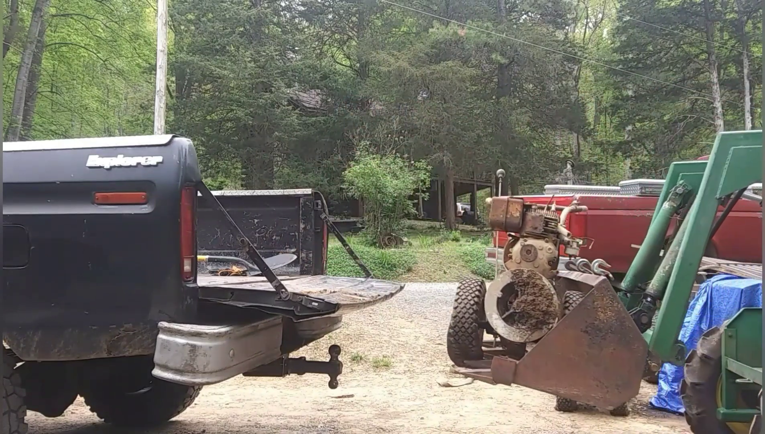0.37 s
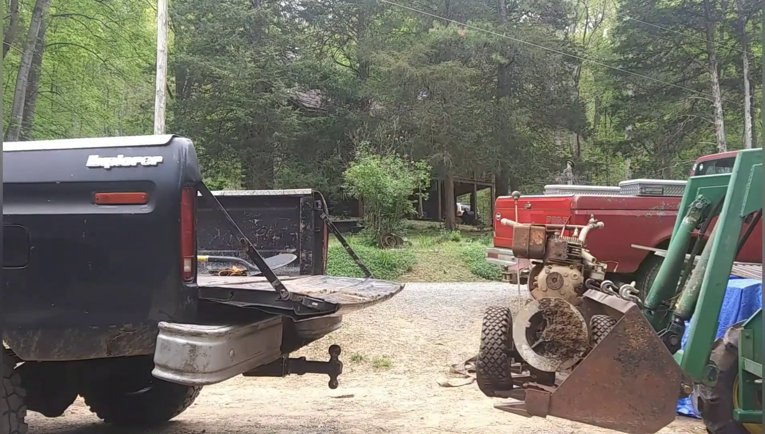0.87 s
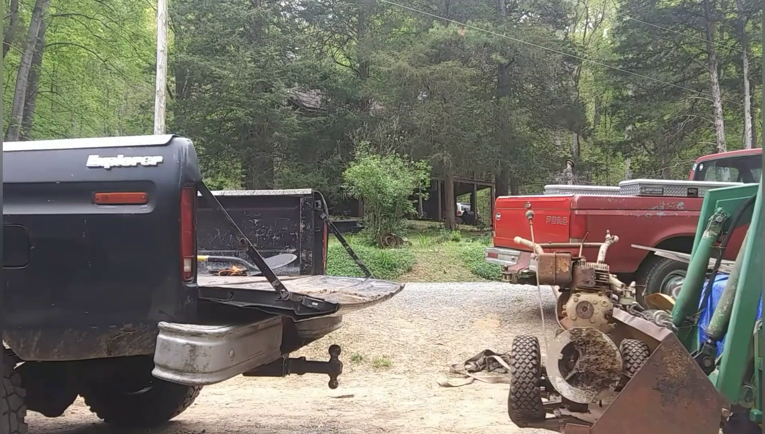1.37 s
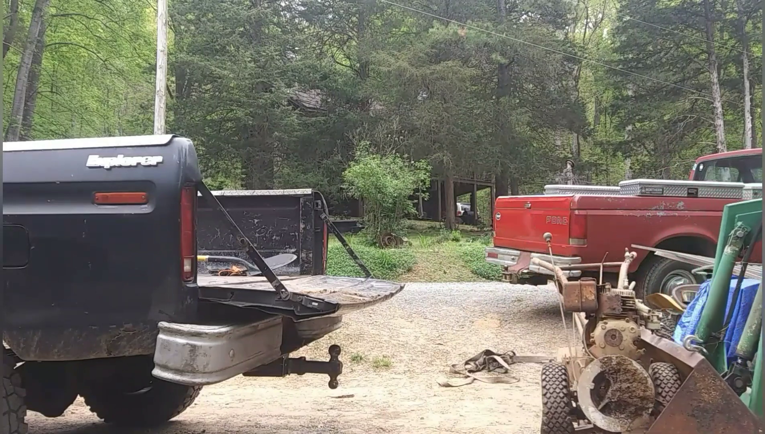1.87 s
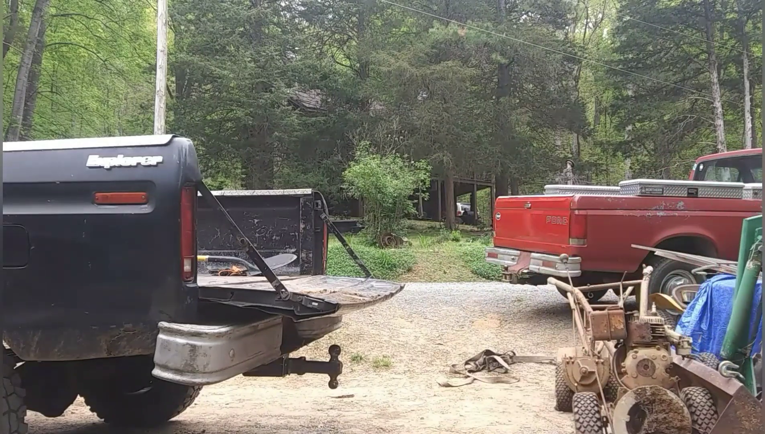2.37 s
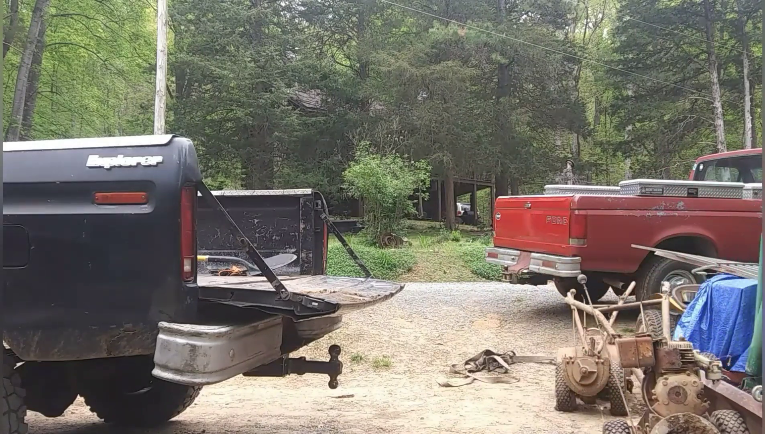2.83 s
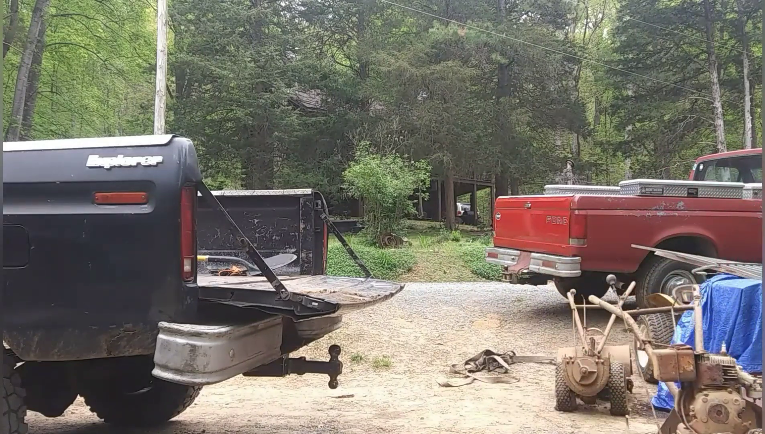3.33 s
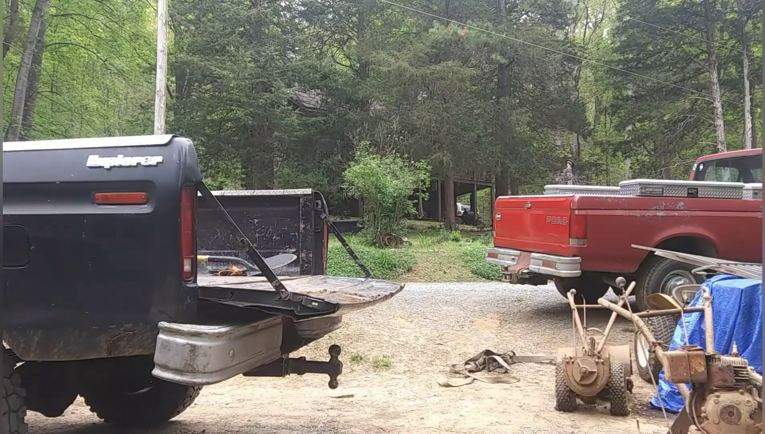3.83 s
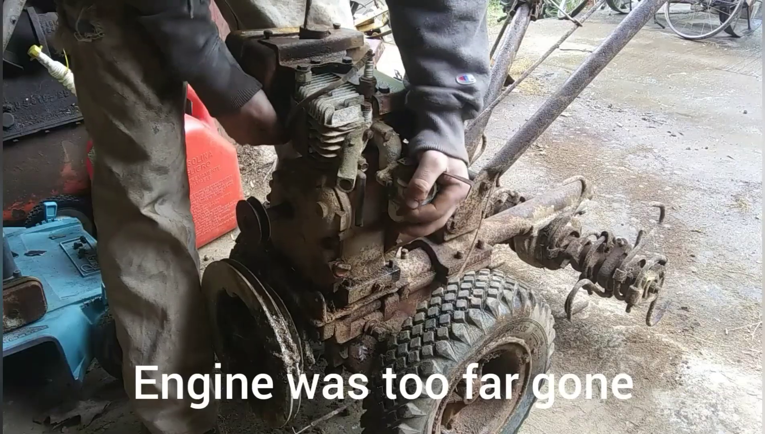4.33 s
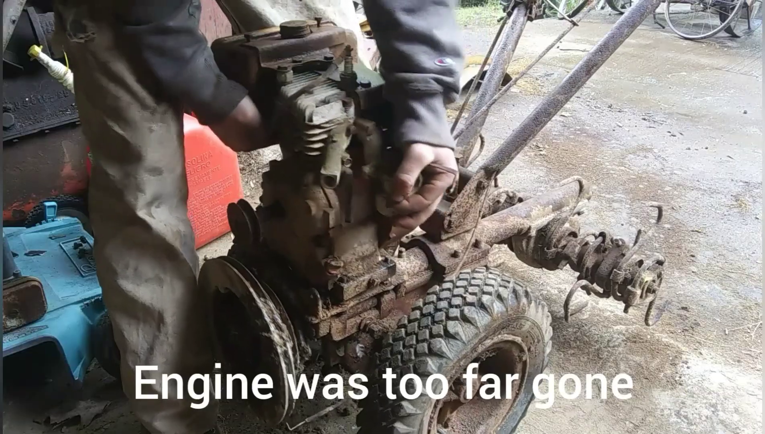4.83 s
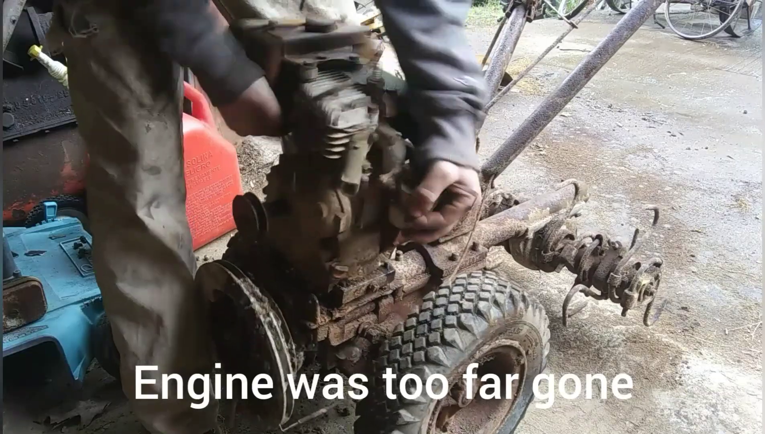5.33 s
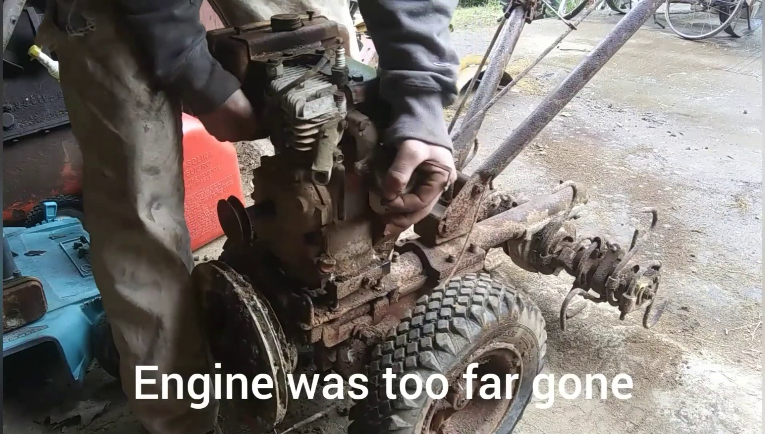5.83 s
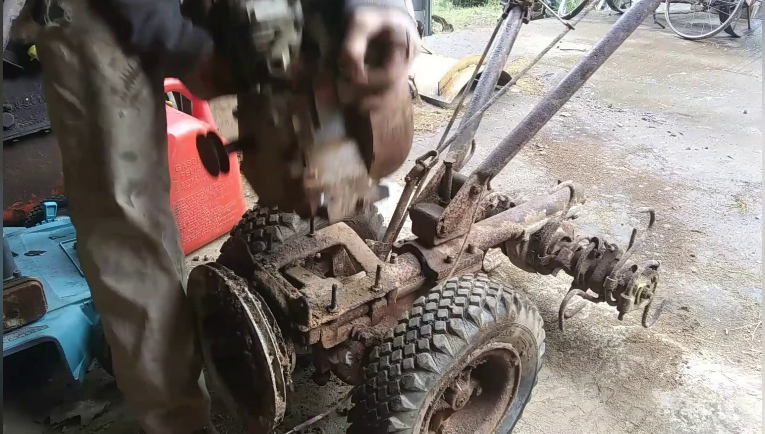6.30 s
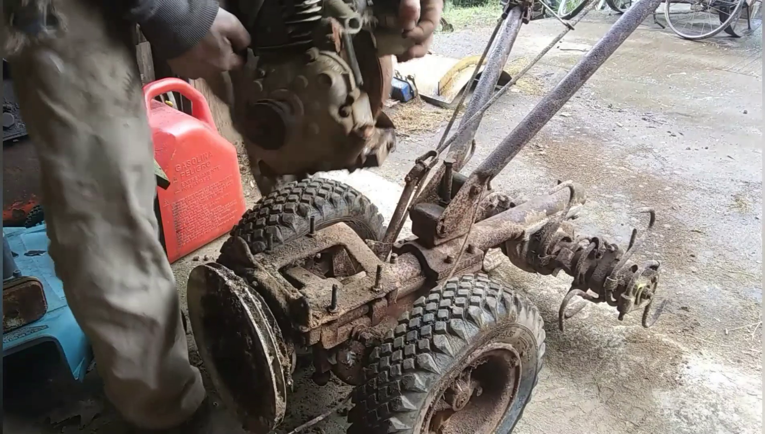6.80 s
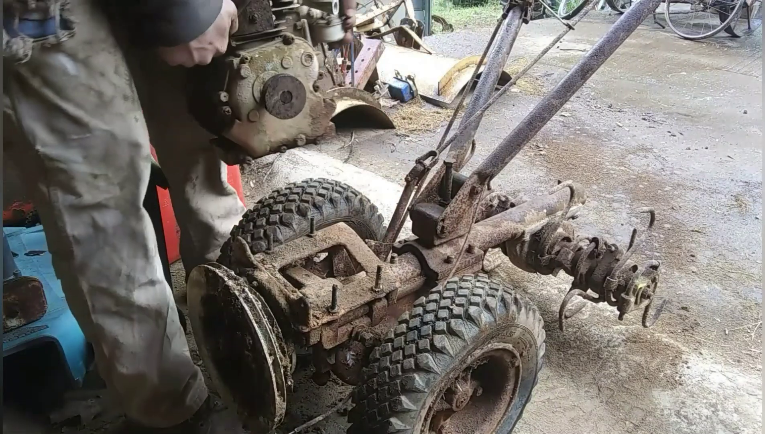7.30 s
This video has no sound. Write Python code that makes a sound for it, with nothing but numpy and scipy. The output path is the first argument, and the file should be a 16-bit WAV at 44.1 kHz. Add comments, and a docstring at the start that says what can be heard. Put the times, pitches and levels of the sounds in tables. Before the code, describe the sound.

From 0 to 3.9 seconds a small diesel tractor runs loudly in an open yard: rapid knocking about twenty-one cycles a second, a buzzing low-mid exhaust throb, rough clatter and hissy tinwork. Speed stays governed, with a tiny sag around 1.5; the tone shifts and dulls slightly as it backs away. At 3.95 it stops dead on a cut to a quieter concrete shed. Grit scuffs, then a squeak and clank at 4.4, more squeaks around 4.7 and tinny clinks to 4.9. Iron clanks cluster from 5.0 to 5.4, with chirping squeaks around 5.5, clinks near 5.7 and harsher squeaks at 5.85 to 6.0. The strongest heavy clanks and a scrape fall at 6.0 to 6.3. Afterwards come sparse boot shuffles, fading grit and faint creaks, near silence around 7.3, and a soft knock with creaks at 7.55. Close microphone, short reverberation, slight hiss.

```python
"""Tractor in a yard, then a seized engine

A small diesel tractor runs in a yard: exhaust throb from multiples of the engine cycle, knocks and
noise shaped by the block. The scene then cuts to an open shed, where a seized engine is rocked loose
from a rusty frame: the joint squeaks as stick-slip tones, iron clanks and sheet metal clinks as struck
modes, grit scrapes and boots shuffle on concrete as swells of grainy noise, and narrow noise creaks."""
import sys
import numpy as np
from scipy import signal
from scipy.fft import rfft, irfft, next_fast_len
from scipy.io import wavfile

SR = 44100
rng = np.random.default_rng(int(sys.argv[2]) if len(sys.argv) > 2 else 0)


def volts_from_decibels(level):
    """Turn decibel levels (scalar or array-like) into linear amplitude factors."""
    exponent = np.asarray(level, float) / 20
    return 10 ** exponent


def int16_out(signal):
    """Quantize to a 16-bit WAV file."""
    q = np.round(np.clip(np.atleast_2d(signal).T, -1, 1) * 32767)
    wavfile.write(sys.argv[1], SR, q.astype(np.int16))


N = 338688   # samples, 7.68 s

# the running engine as it backs away and turns: t/s, level/dB, then gains against that level:
# treble/dB, 2 kHz block ring/dB, 9.65 kHz hiss/dB, hum of multiples 12 to 16/dB
RUNNING = [(0, -15.5, -2.5, 0.5, 4.5, -2), (.3, -15.5, -5.5, 0, 3.5, -4.5), (.6, -16, -5, 1, 1, 3),
           (1.3, -16.5, -4, 0.5, 3.5, -0.5), (1.6, -16.5, -5, 0, 4, 0), (1.8, -17.5, -4, 6, 2.5, 0.5),
           (2.3, -16, -6.5, 1.5, 1.5, 2.5), (3, -18, -4.5, 5, 0.5, 4), (3.3, -15, -5, -1.5, 2, 3.5),
           (3.6, -16, -6.5, 2.5, 1.5, -1), (3.92, -17, -7, 2, 0.5, 2)]
CUT_S = 3.945   # the yard ends, the shed begins
# governed speed, sagging once under load: t/s, engine cycles per second/Hz
ENGINE_SPEED = [(0, 21.295), (1.3, 21.295), (1.48, 21.0), (1.66, 21.31), (3.25, 21.31), (3.4, 21.41),
                (3.95, 21.41)]
START_CYCLE = -0.48
# exhaust throb on the cycle's multiples: multiple, relative level/dB
EXHAUST = [(4, -31), (5, -25), (6, -9), (7, -21), (8, -12), (9, -17), (10, -10), (11, -11), (12, -7),
           (13, -8), (14, 0), (15, -3.5), (16, -4), (17, -2), (18, -3), (19, -1), (20, -5), (21, -6),
           (22, -13), (23, -12), (24, -7), (25, -9), (26, -14)]
# higher multiples that stand out of the clatter: multiple, relative level/dB
GEAR_LINES = [(32, -8.5), (39, -1), (46, -4), (48, -17), (53, -2), (58, -8), (62, -3)]
# the 24th multiple grows near the end: t/s, gain/dB
LATE_LINE = [(0, -1.5), (3.35, 3), (3.55, 8)]
EXHAUST_DB = -19   # all these lines against the engine noise
THUMP_SLANT_RAD, THUMP_SPREAD_DB = .03, 2   # each thump falls in pitch; the strength drifts
# knocks within one cycle: share of the cycle, relative level/dB, t60/s (shorter in the treble)
KNOCKS = [(0.92, 9, 0.037), (0.46, 6.5, 0.033), (0.079, -6.5, 0.074), (0.299, 4, 0.014)]
KNOCK_RISE_S = .0042
# how much of the clatter throbs with the knocks: f/Hz, knock against steady noise/dB
KNOCK_SHARE = [(400, -4), (1000, -3), (2200, 1), (3000, 1.5), (5000, -.5), (9000, -5), (15000, -7)]
# spectrum of engine block and tinwork: f/Hz, relative density/dB
CLATTER = [(35, -63), (60, -41), (113, -3.5), (168, -1.5), (287, 1.5), (388, 0.5), (591, -9), (1010, -6.5),
           (1470, -10), (1650, -16.5), (1990, -16.5), (3490, -19.5), (4300, -12), (9740, -14.5),
           (15900, -19.5)]
# resonances of the block: f/Hz, width/Hz, boost/dB
BLOCK = [(824, 290, 2), (1045, 160, 5.5), (1477, 210, 5), (1990, 576, 9), (2910, 135, 7.5),
         (4260, 600, 3.5), (5670, 980, 3.5), (8500, 230, 8), (8540, 200, -6)]
TICK_DB, TICK_T60_S = -12.5, .012   # ticks of the block's upper resonances, against the noise

# steady rubbing of the load on the frame: t/s, level/dB
RUBBING = [(3.95, -44), (4.1, -45.5), (4.46, -57), (4.62, -43), (5.0, -42), (5.29, -39), (5.38, -33.5),
           (5.48, -37.5), (5.67, -46), (5.9, -46), (6.05, -31.5), (6.17, -33), (6.3, -41.5), (6.5, -57.5),
           (6.84, -48), (7.15, -67), (7.4, -50.5), (7.68, -46.5)]
# spectrum of the grit: f/Hz, relative density/dB
GRIT = [(35, -83), (60, -46), (96, -12), (176, -4.5), (362, -9), (839, -5), (900, -5.5), (1370, -5.5),
        (2760, -11), (7890, -23), (15900, -41.5)]
RUB_TREBLE_DB = -11.5   # part above 3 kHz against the dull part
# scuffs of grit and boots: t/s, peak level/dB, t60/s, treble against the peak/dB
SCUFFS = [(4.028, -38.5, 0.43, -5.5), (4.07, -36.5, 0.42, -17), (4.375, -47, 0.33, -28),
          (4.401, -37.5, 0.86, -27), (4.455, -40.5, 0.79, -3), (4.569, -51.5, 0.61, 8.5),
          (4.609, -37, 0.7, -12), (4.81, -35, 0.07, -8), (5.125, -38.5, 0.69, 0), (5.587, -34, 0.26, -5),
          (5.948, -39.5, 0.26, 7.5), (6.2, -20.5, 0.17, -10.5), (6.49, -44.5, 0.53, -8),
          (6.594, -47, 0.41, -10), (6.697, -48.5, 1.1, -5.5), (6.731, -39, 0.81, -10),
          (6.789, -41, 0.2, -0.5), (6.938, -46.5, 0.82, -8.5), (7.152, -57, 0.54, 3.5),
          (7.195, -57, 0.22, 5), (7.292, -54, 0.74, -2.5), (7.394, -61, 0.18, 8), (7.545, -40.5, 0.42, -14),
          (7.595, -45, 0.23, -23)]
SCUFF_RISE_S = .004
# stick-slip squeaks of the joint: t of the peak/s, swell/s, fade/s, peak level/dB,
# slip rate at the peak f/Hz, loss to the octave/dB, loss per further overtone/dB
SQUEAKS = [(4.426, 0.021, 0.021, -20.5, 1081, 18, 12), (4.652, 0.004, 0.022, -27.5, 1076, 2, 15),
           (4.672, 0.014, 0.018, -22, 1074, 1.5, 9.5), (4.716, .012, 0.024, -33, 1074, 24, 12),
           (4.831, 0.023, 0.014, -32.5, 1095, 25, 12), (5.388, 0.0072, 0.0089, -22.5, 1107, 5, 12),
           (5.465, 0.012, 0.013, -21, 1117, 5, 16), (5.485, 0.016, 0.016, -23.5, 1090, 8, 14),
           (5.507, 0.012, 0.045, -27, 1095, 12, 18), (5.57, 0.012, 0.049, -34, 1106, 18, 12),
           (5.847, 0.0078, 0.0036, -23.5, 1105, 3.5, 2.5), (5.856, 0.0087, 0.014, -21.5, 1139, 6.5, 9),
           (5.931, 0.024, 0.026, -25, 1102, 0.5, 8.5), (5.953, 0.007, 0.0073, -16.5, 1086, 7, 7),
           (5.965, 0.00415, 0.012, -30, 1137, 15, 10), (5.99, .012, 0.0099, -28, 1090, 15, 8),
           (6.06, .015, 0.058, -34, 1130, 17, 12)]
CATCH_DB, RELEASE_DB = -18, -22   # where a squeak sets in and lets go, before scaling per partial
FIRST_STEEPNESS, OVERTONE_STEEPER = .72, .16   # scale of that dB shape, and its growth per overtone
GLIDE_HZ_PER_S, WAVER_HZ = 310, 24   # the slip rate climbs through a squeak and wanders
# modes of cast iron, damped by hands and rust: f/Hz, relative level/dB, t60/s
IRON = [(371, -3, .13), (440, -7, .06), (506, -1, .11), (650, -4, .045), (790, -3, .16), (880, -7, .07),
        (1110, -8, .06), (1450, -8, .05), (1630, -8, .06), (2130, 0, .05), (2340, -6, .05), (2640, -4, .04),
        (2810, -5, .05), (3560, -9, .03), (3900, -8, .03), (4500, -14, .04)]
# blows on the iron: t/s, peak level/dB, crack against the ring/dB,
# low and high pitch struck hardest f/Hz, f/Hz
CLANKS = [(4.404, -19, -25, 2190, 3780), (4.998, -27, -12, 506, 1110), (5.021, -20, -7, 2350, 2810),
          (5.037, -12.5, -18, 1110, 1110), (5.059, -15.5, -1.5, 790, 2130), (5.117, -23.5, 6.5, 1340, 1930),
          (5.144, -23.5, 5.5, 1040, 2820), (5.177, -14, -4, 1110, 2300), (5.193, -15, -17, 650, 1110),
          (5.262, -30, -12, 1450, 1450), (5.315, -11.5, 0.5, 790, 2130), (5.376, -18, 7, 1110, 2810),
          (5.422, -28, 13, 1090, 2450), (5.588, -35, 18.5, 1010, 2010), (5.674, -22, -13, 1630, 1630),
          (5.717, -25, -3, 1620, 1630), (6.002, -15, -9, 740, 650), (6.118, -7, -5, 1050, 2500),
          (6.141, -8.5, 4, 1110, 3560), (6.176, -17, 3, 790, 2810), (6.201, -6.5, 0, 880, 2340),
          (6.211, -10.5, -15, 506, 2810), (6.284, -18, -18, 374, 1450), (6.801, -29, 5, 790, 1450),
          (7.396, -37, 2, 1110, 2130), (7.541, -26, 1.5, 1110, 2130)]
# modes of the sheet metal shroud: f/Hz, relative level/dB, t60/s
TIN = [(3150, 8, 0.045), (3300, 2, 0.047), (3920, -14, 0.06), (4770, -5, 0.037), (5540, -5, .04),
       (6130, -6, 0.045), (6770, -11, 0.073), (7800, -1, 0.06), (8600, -5, .08), (9200, -11, .1),
       (9690, -4, 0.08), (10420, -2, .03), (11040, -9, 0.061)]
# taps on the shroud: t/s, peak level/dB, crack against the ring/dB,
# low and high pitch struck hardest f/Hz, f/Hz
CLINKS = [(4.7619, -23, 0, 3190, 3200), (4.795, -27, -8, 3280, 3280), (4.894, -27, -8, 3220, 3240),
          (4.901, -18, 2, 4770, 4770), (4.927, -27, 6, 3240, 9690), (5.074, -33, -14, 6770, 8600),
          (5.231, -17.5, 7, 3150, 6130), (5.2775, -24, -6, 3150, 3300), (5.379, -18, -14, 4770, 6130),
          (5.423, -18.5, 2, 5540, 10420), (5.659, -20, -8, 4770, 4770), (5.687, -19, -1, 3920, 3920),
          (6.0442, -14.5, 4, 3300, 11040), (6.0962, -12, -5, 3300, 6770)]
# shed reverberation: f/Hz, t60/s
SHED = [(300, 0.44), (1000, 0.2), (4000, 0.14), (12000, 0.12)]
SHED_DB, SHED_MIC_HZ = -18, 380   # gain of the reverberation; bass cut of the microphone in the shed
# creaks, a rough narrow ring while something drags: t/s, length/s, level/dB, pitch f/Hz, glide/(Hz/s)
CREAKS = [(6, 0.052, -31, 720, -1000), (6.212, 0.13, -47, 436, 5), (6.27, 0.039, -34, 1310, 0),
          (6.503, 0.083, -59, 735, 0), (6.703, 0.078, -41, 1370, 0), (6.959, 0.062, -48, 1120, -2000),
          (7.14, 0.083, -53.5, 612, 4), (7.18, 0.056, -52, 2270, 17), (7.293, 0.056, -51, 1720, -1000),
          (7.545, .07, -43, 2100, 0), (7.541, 0.081, -37.5, 1202, -1500), (7.545, 0.065, -40, 1615, 2000),
          (7.594, 0.016, -49, 3300, -18000), (7.622, .02, -47, 2980, 0), (7.6, .079, -39.5, 1135, -300),
          (7.607, .06, -44, 1900, 0)]
CREAK_WIDTH_HZ = 155
CREAK_RISE = .2   # share of a creak's length spent rising
AIR_DB, HISS_DB = -100, -69.5   # low rumble of the air; the microphone's own hiss


def rms_one(x):
    """Scale to unit rms."""
    return x / np.sqrt(np.mean(abs(x) ** 2) + 1e-20)


def filtered(x, order, hz, kind="low"):
    """Butterworth filter."""
    return signal.sosfilt(signal.butter(order, hz, kind, fs=SR, output="sos"), x)


def in_time(rows):
    """Columns of a table as sample-rate curves."""
    s, *columns = np.transpose(rows)
    return [np.interp(np.arange(N) / SR, s, c) for c in columns]


def at_hz(points, hz):
    """Read a spectrum on a log-frequency axis."""
    table_hz, value = np.transpose(points)
    return np.interp(np.log(hz + 1), np.log(table_hz), value)


def colour(x, db_at):
    """Filter by a gain in dB given as a function of frequency."""
    return irfft(rfft(x) * volts_from_decibels(db_at(np.fft.rfftfreq(N, 1 / SR))), N)


def above_db(hz, corner):
    """Gentle corner that keeps what lies above it."""
    return -10 * np.log10(1 + (corner / (hz + 1)) ** 4)


def near_db(hz, centre, reach):
    """Band that keeps what lies within reach of its centre."""
    return -10 * np.log10(1 + ((hz - centre) / reach) ** 4)


def drift(hz):
    """Slow random wander of spread 1, faster for higher hz."""
    steps = rng.standard_normal(int(N / SR * 100) + 2)   # 100 per second
    width = 100 / hz / 3
    kernel = np.exp(-.5 * (np.arange(-150, 151) / width) ** 2)
    slow = np.convolve(steps, kernel / np.sqrt(np.sum(kernel ** 2)), "same")
    return np.interp(np.arange(N) / SR * 100, np.arange(len(slow)), slow)


def ring(clicks, hz, t60):
    """A unit click sets a sine of height 1 ringing."""
    r, w = volts_from_decibels(-60 / (t60 * SR)), 2 * np.pi * hz / SR
    return signal.lfilter([0, np.sin(w)], [1, -2 * r * np.cos(w), r * r], clicks + 1e-18)


def fading(starts, t60):
    """Each impulse becomes a step that dies away."""
    return signal.lfilter([1], [1, -volts_from_decibels(-60 / (t60 * SR))], starts + 1e-18)


def exhaust(cycles, hum_db):
    """Throb as wavering sines on the cycle's multiples; all dip together once a cycle."""
    late_db, = in_time(LATE_LINE)
    throb = 0
    for k, db in EXHAUST + GEAR_LINES:
        level_waver = min(.015 * k, .2) if k < 30 else .42
        # the real part bends the phase, the imaginary part the level
        waver = .016 * k * drift(5) + 1j * level_waver * drift(4) + .008 * k * drift(12)
        slant = THUMP_SLANT_RAD * (min(k, 26) - 16) ** 2
        line = np.real(np.exp(1j * (2 * np.pi * k * cycles + slant + waver)))
        extra_db = hum_db if 12 <= k <= 16 else late_db if k == 24 else 0
        throb = throb - volts_from_decibels(db + extra_db) * line
    return throb * volts_from_decibels(THUMP_SPREAD_DB * drift(16))


def block_db(hz):
    """Spectrum of the clatter with the block's resonances on top; the bass belongs to the exhaust lines."""
    bass_db = -8.5 / (1 + (hz / 450) ** 3) - 8 / (1 + (hz / 190) ** 6)
    resonance_db = sum(db / (1 + (2 * (hz - top) / width) ** 2) for top, width, db in BLOCK)
    return at_hz(CLATTER, hz) + bass_db + resonance_db


def knock_gate(cycles, cycle_s, shortening):
    """Loudness of the knocks: each rises, dies away and has its own chance strength."""
    gate, late = np.zeros(N), cycles + .016 * drift(12)
    for share, db, t60 in KNOCKS:
        since = (late - share) % 1 * cycle_s
        strength_db = rng.normal(0, 2.3, 200)[(late - share + 1).astype(int)]   # one per cycle
        decay_db = -60 * since / (t60 * shortening)
        gate += volts_from_decibels(db + strength_db + decay_db) * np.minimum(since / KNOCK_RISE_S, 1)
    return rms_one(gate)


def clatter(cycles, cycle_s):
    """Steady fan and gear noise plus knock noise that shakes each band differently; rms 1."""
    noise = colour(rng.standard_normal(N), block_db)
    edges_hz = [300, 700, 1600, 2500, 3500, 5000, 7000, 16000]
    for low, high in zip(edges_hz, edges_hz[1:]):
        def band_db(hz):
            inside = np.where((hz >= low) & (hz < high), 0, -99)
            return block_db(hz) + at_hz(KNOCK_SHARE, hz) + inside

        gate = knock_gate(cycles, cycle_s, .75 if low >= 2500 else 1)
        noise += volts_from_decibels(1.7 * drift(3.8)) * colour(gate * rng.standard_normal(N), band_db)
    return rms_one(noise)


def ticks(cycles):
    """The two main knocks of each cycle strike the block's upper resonances at chance strengths; rms 1."""
    struck = 0
    for share, db, t60 in KNOCKS[:2]:
        passed = np.diff(np.floor(cycles - share - .03), prepend=0) == 1
        struck = struck + volts_from_decibels(db / 4) * passed
    at, out = np.flatnonzero(struck), 0
    for hz, width, db in BLOCK[3:7]:
        clicks = np.zeros(N)
        clicks[at + rng.integers(0, 60, len(at))] = struck[at] * volts_from_decibels(rng.normal(0, 5, len(at)))
        out = out + ring(clicks, hz, TICK_T60_S)
    return rms_one(filtered(out, 2, 1000, "high"))


def tractor():
    """Exhaust throb, clatter and ticks all follow one engine cycle; the tone moves until the cut."""
    speed, = in_time(ENGINE_SPEED)
    cycles = START_CYCLE + np.cumsum(speed) / SR
    level_db, treble_db, ring_db, hiss_db, hum_db = in_time(RUNNING)
    throb = exhaust(cycles, hum_db)
    noise = clatter(cycles, 1 / speed) + volts_from_decibels(TICK_DB) * ticks(cycles)
    treble = colour(noise, lambda hz: above_db(hz, 5000))
    block_ring = colour(noise, lambda hz: near_db(hz, 2000, 250))
    high_hiss = colour(noise, lambda hz: near_db(hz, 9650, 330))
    engine = noise + np.sqrt(2) * volts_from_decibels(EXHAUST_DB) * throb
    for part, gain_db in [(high_hiss, hiss_db), (treble, treble_db), (block_ring, ring_db)]:
        engine = engine + (volts_from_decibels(gain_db) - 1) * part
    until_cut = np.clip((CUT_S - np.arange(N) / SR) / 0.00033, 0, 1)
    return volts_from_decibels(level_db) * engine * until_cut


def rattle():
    """Flakes of rust and loose parts tick at random, each ringing one iron or tin mode briefly; rms 1."""
    modes = IRON + TIN
    happens = rng.random(N) < 600 / SR   # 600 ticks per second on average
    sizes = volts_from_decibels(5.0 * np.minimum(rng.exponential(1, N), 2.5)) * happens
    dealt = rng.integers(0, len(modes), N)
    out = 0
    for k, (hz, db, t60) in enumerate(modes):
        out = out + ring(sizes * (dealt == k), hz, 0.025) * volts_from_decibels(at_hz(GRIT, hz))
    return rms_one(out)


def rubbing():
    """Dense grit grains, dull (ringing the frame near 1.2 kHz) and bright; scuffs swell, metal ticks."""
    t = np.arange(N) / SR
    dull_power = volts_from_decibels(2 * in_time(RUBBING)[0]) * (t > CUT_S)
    bright_power = dull_power * volts_from_decibels(2 * RUB_TREBLE_DB)
    for s, db, t60, treble_db in SCUFFS:
        rise = np.clip((t - s) / SCUFF_RISE_S, 0, 1) ** 2
        swell = volts_from_decibels(2 * (db - 60 * np.maximum(t - s - SCUFF_RISE_S, 0) / t60)) * rise
        dull_power = dull_power + swell
        bright_power = bright_power + swell * volts_from_decibels(2 * treble_db)
    grain_db = 2.0 * drift(8.2) + 3.1 * np.minimum(rng.exponential(1, N), 4)
    grains = rng.standard_normal(N) * volts_from_decibels(grain_db)

    def dull_db(hz):
        frame_db = 5 / (1 + ((hz - 1200) / 120) ** 2)
        return at_hz(GRIT, hz) + frame_db - 10 * np.log10(1 + (hz / 3000) ** 4)

    dull = rms_one(colour(grains, dull_db))
    bright = rms_one(colour(grains, lambda hz: at_hz(GRIT, hz) + above_db(hz, 3000)))
    # the ticks are strongest while the joint is worked
    working = np.interp(t, [4.5, 4.8, 6.3, 6.4], [.5, 1.0, 1.0, .5])
    return np.sqrt(dull_power) * (dull + working * rattle()) + np.sqrt(bright_power) * bright


def squeaks():
    """Uneven slips catch, swell and fade; overtones move more steeply and are roughened on their own."""
    out, t = np.zeros(N), np.arange(N) / SR
    real, imaginary = filtered(rng.standard_normal((2, 4, N)), 2, 130)
    rough = [(.15 + .2 * k ** 1.3) * rms_one(r) for k, r in enumerate(real + 1j * imaginary, 1)]
    wander_hz = WAVER_HZ * drift(29.5)
    ends = volts_from_decibels(np.array([CATCH_DB, 0, RELEASE_DB]) / 2)
    for s, swell, fade, peak_db, hz, octave_db, further_db in SQUEAKS:
        span = slice(int((s - swell - .01) * SR), int((s + fade + .01) * SR))
        since = t[span] - s
        phase = 2 * np.pi * np.cumsum(hz + GLIDE_HZ_PER_S * since + wander_hz[span]) / SR
        edge = np.clip(np.minimum(since + swell, fade - since) / 0.0039 + .5, 0, 1)
        shape_db = 40 * np.log10(np.interp(since, [-swell, 0, fade], ends))
        for k in range(4):
            partial = np.real((1 + rough[k][span]) * np.exp(1j * (k + 1) * phase))
            loss_db = octave_db * min(k, 1) + further_db * max(k - 1, 0)
            moving_db = shape_db * (FIRST_STEEPNESS + OVERTONE_STEEPER * k)
            out[span] += np.sqrt(2) * edge * volts_from_decibels(peak_db - loss_db + moving_db) * partial
    return out


def blows(events, modes, focus_db, contact_t60, crack_t60):
    """A tap plus short rough contact rings the modes, most near the struck pitches, and adds a crack."""
    s, peak_db, crack_db, *struck_hz = np.transpose(events)
    at, out = (s * SR).astype(int), np.zeros(N)
    chance_db = rng.normal(0, 2, (len(events), len(modes)))
    for k, (hz, db, t60) in enumerate(modes):
        octaves_off = np.min(abs(np.log2(hz / np.array(struck_hz))), axis=0)
        off_db = focus_db * np.minimum(octaves_off / 0.16, 1)
        taps = np.zeros(N)
        taps[at] = volts_from_decibels(peak_db + db - 8.5 + chance_db[:, k] - off_db)
        contact = 0.11 * fading(taps, contact_t60) * rng.standard_normal(N)
        out += ring(taps + contact, hz, t60)
    cracks = np.zeros(N)
    cracks[at] = volts_from_decibels(peak_db + crack_db - 6.0)
    burst = fading(cracks, crack_t60) * rng.standard_normal(N)
    out += filtered(burst, 3, [600, 6000], "band")
    return filtered(out, 1, 6000)   # soft rusty faces


def clanks():
    """Blows that ring the cast iron."""
    return blows(CLANKS, IRON, focus_db=16, contact_t60=0.025, crack_t60=0.045)


def clinks():
    """Taps that ring the sheet metal shroud."""
    return blows(CLINKS, TIN, focus_db=22, contact_t60=0.012, crack_t60=0.05)


def shed(x):
    """Sixteen feedback delays whose loop gain follows the decay table."""
    size = next_fast_len(N + SR)
    hz = np.fft.rfftfreq(size, 1 / SR)
    response = 0
    for k, lag in enumerate(rng.uniform(0.01, .04, size=16)):   # seconds
        loop = volts_from_decibels(-60 * lag / at_hz(SHED, hz)) * np.exp(-2j * np.pi * hz * lag)
        response = response + (-1) ** k * loop / (1 - loop)
    return irfft(rfft(x, size) * response, size)[:N]


def creaks():
    """Narrow noise that swells and fades around a gliding pitch."""
    out = np.zeros(N)
    real, imaginary = filtered(rng.standard_normal((2, N)), 2, CREAK_WIDTH_HZ)
    slow = rms_one(real + 1j * imaginary)
    for s, length, db, hz, glide in CREAKS:
        since = np.arange(int(length * SR)) / SR
        span = slice(int(s * SR), int(s * SR) + len(since))
        swell = np.sqrt(np.interp(since / length, [0, CREAK_RISE, 1], [0, 1, 0]))
        turns = hz * since + glide * since ** 2 / 2
        out[span] += np.sqrt(2) * volts_from_decibels(db) * swell * np.real(slow[span] * np.exp(2j * np.pi * turns))
    return out


def scene():
    """One microphone feeds both channels; in the shed its bass is cut harder."""
    metal = squeaks() + clanks() + clinks()
    indoors = metal + volts_from_decibels(SHED_DB) * shed(metal) + rubbing() + creaks()
    mono = tractor() + filtered(indoors, 3, SHED_MIC_HZ, "high")
    return np.stack([mono, mono])


def low_pass(x):
    """Removes everything above the highest recorded frequency."""
    return signal.sosfilt(signal.butter(12, 15800, fs=SR, output="sos"), x)


def record(dry):
    """Rounds peaks, cuts the deepest bass, then adds low air rumble and the microphone's own hiss."""
    air = volts_from_decibels(AIR_DB) * rms_one(filtered(rng.standard_normal(N), 1, 200))
    air = air + volts_from_decibels(HISS_DB) * rng.standard_normal(N)
    rounded = filtered(.8 * np.tanh(dry / .8), 2, 45, "high")
    return low_pass(rounded + air)


dry = scene()
out = record(dry)
int16_out(out)
```